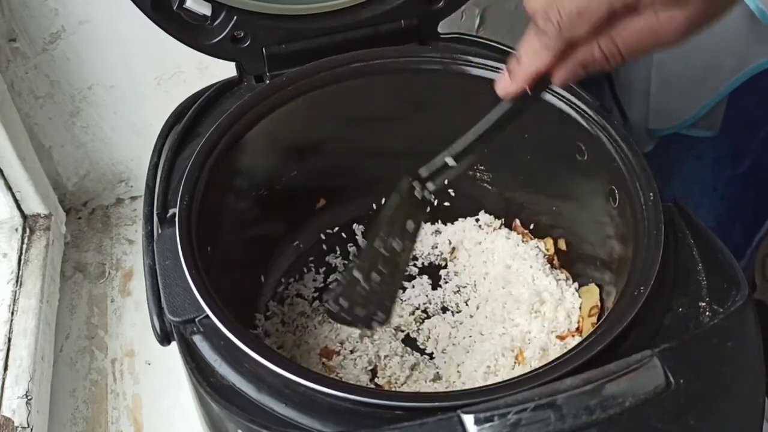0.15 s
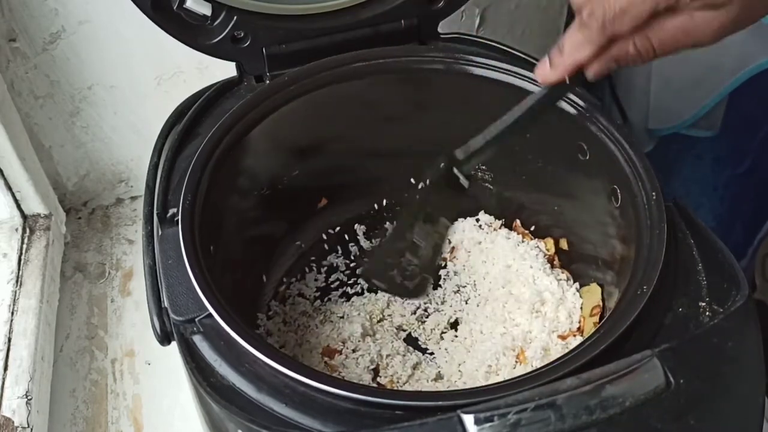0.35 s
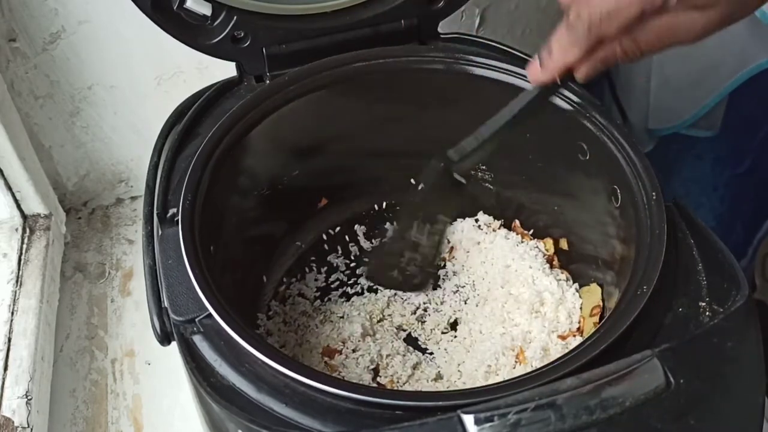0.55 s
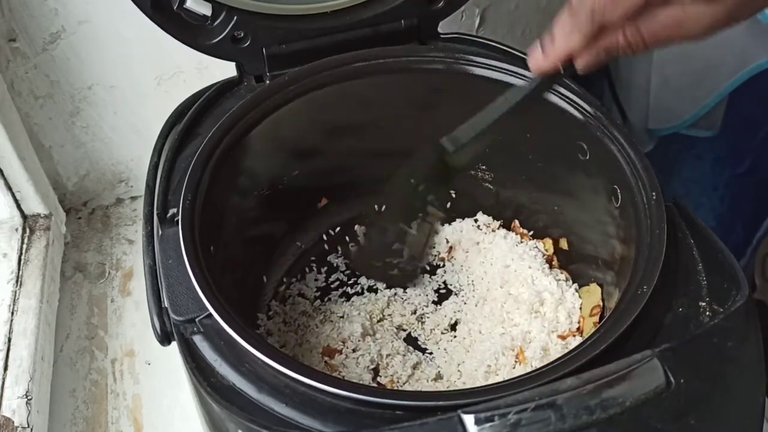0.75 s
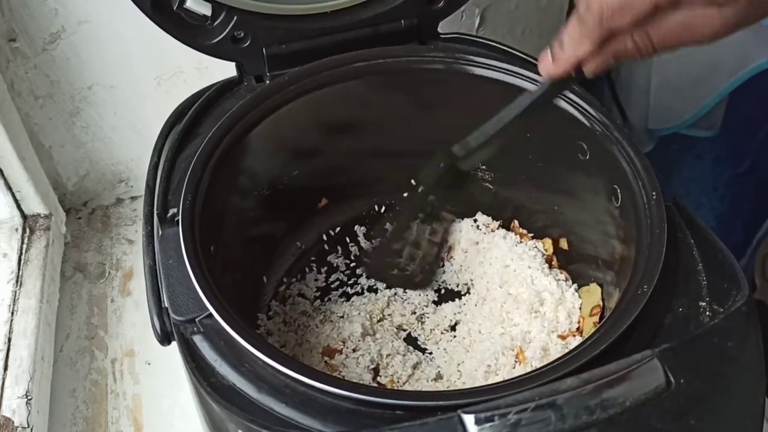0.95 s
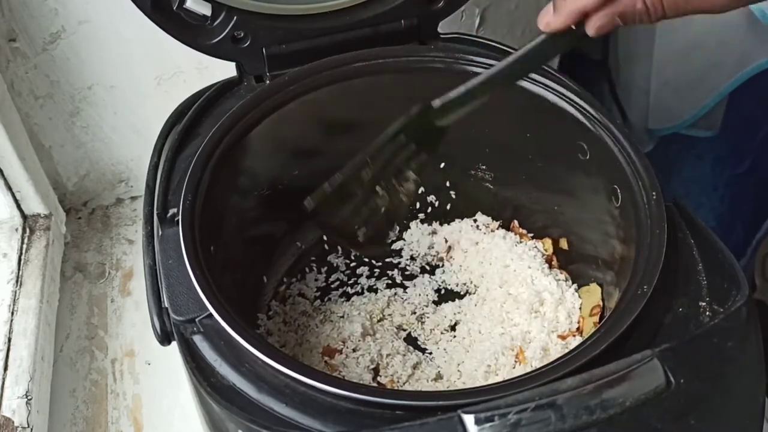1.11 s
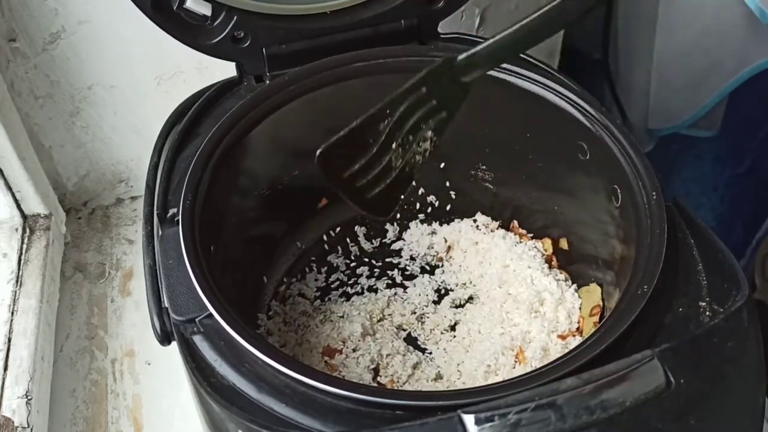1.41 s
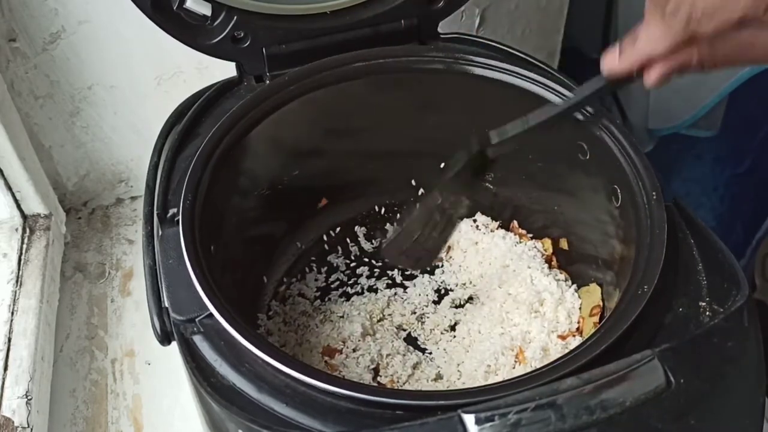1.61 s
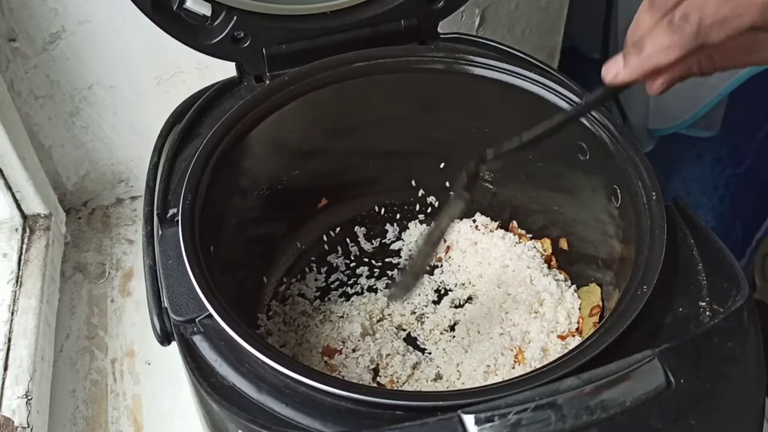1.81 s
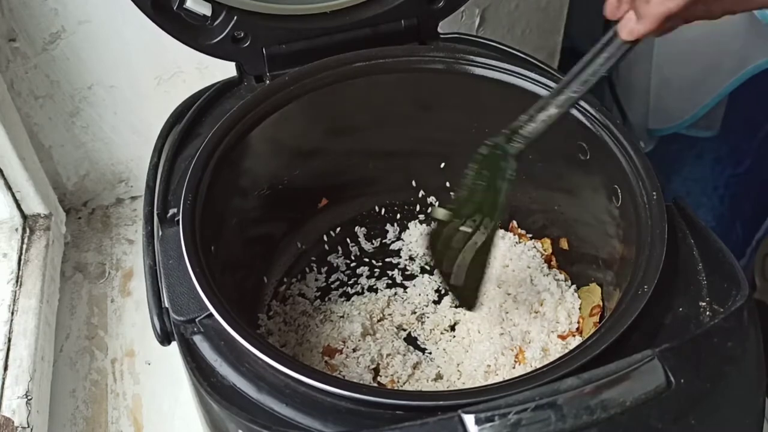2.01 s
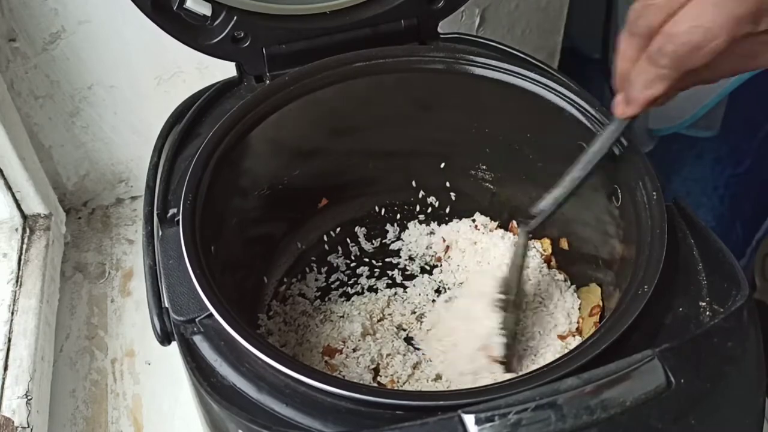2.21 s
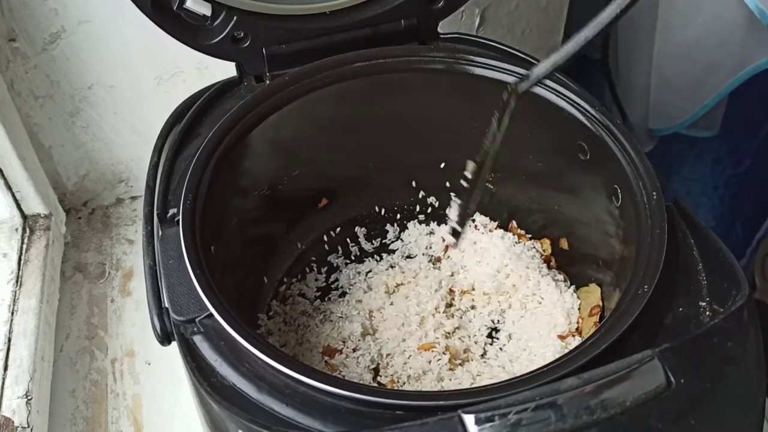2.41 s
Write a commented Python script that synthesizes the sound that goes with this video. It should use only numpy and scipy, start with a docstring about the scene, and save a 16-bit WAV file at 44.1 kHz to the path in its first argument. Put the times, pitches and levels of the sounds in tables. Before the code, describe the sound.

Sharp spatula knocks on a metal bowl, each followed by a short gritty shove of dry rice

```python
"""In a kitchen, a plastic spatula chops nine times through raw rice onto the floor of a coated metal bowl.
A faint hiss leads up to each crack on the metal, then rice is shoved along: all coloured random clicks.
The bowl thuds (grain rumble, sine knocks) and rings (struck modes). Stray grains tick, a few trickle.
A hum and hiss lie beneath. Two microphone ports, the left one nearer."""
import sys
import numpy as np
from scipy import signal
from scipy.fft import rfft, irfft, next_fast_len
from scipy.io import wavfile

SR = 44100
rng = np.random.default_rng(int(sys.argv[2]) if len(sys.argv) > 2 else 0)


def store_pcm(level_fs):
    """Save levels as 16-bit WAV."""
    pcm = np.round(np.clip(level_fs, -1, 1) * 32767).astype(np.int16)
    wavfile.write(sys.argv[1], SR, np.atleast_2d(pcm).T)


N = 112454
T = np.arange(N) / SR


def amp(db):
    """Decibels to a linear factor."""
    return 10 ** (np.asarray(db) / 20)


def rms_one(x):
    """Scale to rms 1."""
    return x / np.sqrt(np.mean(x ** 2) + 1e-20)


def at_hz(points, hz):
    """Read a curve of (Hz, value) points, straight between points on a log frequency axis."""
    point_hz, values = np.array(points).T
    return np.interp(np.log(hz + 1), np.log(point_hz), values)


def colour(x, spectrum, size=4096, unit=True):
    """Causal (minimum-phase) filter of the given spectrum; with unit, white noise keeps its power."""
    hz = np.arange(size // 2 + 1) * SR / size
    cepstrum = irfft(np.log(amp(at_hz(spectrum, hz))))
    # folding the cepstrum forward in time makes the phase minimum
    cepstrum[1:size // 2] *= 2
    cepstrum[size // 2 + 1:] = 0
    pulse = irfft(np.exp(rfft(cepstrum)))
    if unit:
        pulse = pulse / np.sqrt(np.sum(pulse ** 2))
    return signal.fftconvolve(x, pulse[None] if x.ndim > 1 else pulse, axes=-1)[..., :N]


def grains(per_s, spread_db):
    """Two unrelated trains of random clicks of uneven size; rms 1."""
    sizes = amp(spread_db * np.minimum(rng.exponential(1, (2, N)), 4))
    signs = rng.choice([-1, 1], (2, N))
    return rms_one(sizes * signs * (rng.random((2, N)) < per_s / SR))


def ring(x, hz, t60):
    """Two-pole resonance: a unit click sets a decaying sine of starting height 1 ringing."""
    r, w = amp(-60 / (t60 * SR)), 2 * np.pi * hz / SR
    return signal.lfilter([0, np.sin(w)], [1, -2 * r * np.cos(w), r * r], x + 1e-18)


def drift(rate_hz):
    """Slow random wandering, rms 1: noise through two equal low-pass poles."""
    r = np.exp(-2 * np.pi * rate_hz / SR)
    settled = signal.lfilter([1], [1, -2 * r, r * r], rng.standard_normal(N + SR))[SR:]
    return rms_one(settled)


def fall(start, db, db_per_s, hold=0., rise=0.00038):
    """Envelope: short rise, hold, then a steady fall in dB."""
    attack = np.clip((T - start) / rise, 0, 1)
    return attack * amp(db - db_per_s * np.clip(T - start - hold, 0, 1))


def ports(pair, likeness, lag_s):
    """Blend two unrelated signals into left and right of given likeness; the right port hears later."""
    size = next_fast_len(N + 256)
    hz = np.arange(size // 2 + 1) * SR / size
    alike = np.clip(at_hz(likeness, hz), 0, 1)
    shared, opposed = rfft(pair, size) / np.sqrt(2)
    shared, opposed = np.sqrt(1 + alike) * shared, np.sqrt(1 - alike) * opposed
    late = np.exp(-2j * np.pi * hz * lag_s)
    return irfft([shared + opposed, (shared - opposed) * late], size)[:, :N]


def pan(x, db):
    """Raise the left over the right by db in all; a negative value leans right."""
    return x * amp([[db / 2], [-db / 2]])


# Spectrum of the room hiss. Each row: frequency in Hz, relative level in dB.
AIR_SPECTRUM = [(30, -30.5), (95, -11), (157, -19.5), (283, -27.5), (454, -18), (603, -32), (944, -32),
                (2940, -47), (5000, -47), (6800, -45), (8500, -45), (13000, -34)]
# Stereo match of the hiss. Each row: frequency in Hz, left-right likeness from 0 to 1.
AIR_LIKENESS = [(60, 0.95), (300, 0.76), (1500, 0.067), (8000, 0.12)]
# The hum swells and sinks. Each row: time in seconds, mean level in dB.
HUM_LEVELS = [(0, -50.5), (.2, -57), (1.2, -59), (1.4, -47), (1.7, -43), (1.9, -60), (2.2, -47.5),
              (2.55, -47)]
AIR_DB, HUM_HZ, HUM_WAVER_DB = -48, 98.4, 1.9


def air():
    """Room noise as coloured hiss, plus a wavering sine hum that is the same at both ports."""
    hum_db = np.interp(T, *np.transpose(HUM_LEVELS)) + HUM_WAVER_DB * drift(3.0)
    hum = np.sqrt(2) * amp(hum_db) * np.sin(2 * np.pi * HUM_HZ * T)
    hiss = ports(colour(rng.standard_normal((2, N)), AIR_SPECTRUM), AIR_LIKENESS, 0)
    return amp(AIR_DB) * hiss + hum


# Loose grains trickling back. Each row: start in seconds, level in dB, hold in seconds.
TRICKLES = [(0, -55, 0.3), (2.367, -58, 0.062)]
# Spectrum of sliding rice. Each row: frequency in Hz, relative level in dB.
SLIDE_SPECTRUM = [(500, -21), (1100, -13.5), (1500, -6.5), (2180, -3.5), (3080, -3.5), (3900, 1),
                  (5020, -8.5), (6780, 5), (8500, -3), (13000, -2.5)]


def trickles():
    """Faint sliding of grains at the start and after the last chop: sparse, fairly even clicks."""
    env = sum(fall(s, db, 220, hold, 0.007) for s, db, hold in TRICKLES)
    return colour(env * grains(1400.0, 1.6), SLIDE_SPECTRUM)


# Stray grains that drop. Each row: start in seconds, level in dB.
TICKS = [(0.1237, -27), (1.54, -31), (2.1143, -28), (2.41, -31.5), (2.4322, -36.5)]
# Spectrum of grain on metal. Each row: frequency in Hz, relative level in dB.
CRACK_SPECTRUM = [(300, -9), (630, -3.5), (1230, -14.5), (1650, -17), (3240, -4), (3830, 1), (5070, -11),
                  (6800, 3.75), (8500, -3.5), (13000, -4.5)]
CRACK_GRAINS_PER_S, CRACK_SPREAD_DB = 6000, 2.5
CRUSH_CREST_DB = 8.5  # taken off a listed level to set the level of its grain burst
TICK_T60_S = 0.0082


def ticks():
    """Single grains drop: very short bursts of clicks with the colour of the cracks."""
    env = sum(fall(s, db - CRUSH_CREST_DB, 60 / TICK_T60_S) for s, db in TICKS)
    return colour(env * grains(CRACK_GRAINS_PER_S, CRACK_SPREAD_DB), CRACK_SPECTRUM)


# The nine chops. Each row: start in seconds, crack level in dB, lead-in hiss length in seconds,
# lead-in hiss level in dB, shove level in dB, shove and thud hold in seconds, thud level in dB,
# boom level in dB, ring levels of the low, middle and high bowl modes in dB, upper-treble gain in dB,
# slap pitch in Hz, slap level in dB, rasp level in dB.
CHOPS = [(0.2357, -3, 0.032, -31.5, -30.5, 0.038, -24.5, -66, -36.5, -31.5, -43, 0.5, 1736, -18, -38.5),
         (0.4025, 1.5, 0.02, -25.5, -29, 0.047, -25, -27, -35, -41, -50, -2.5, 1930, -26, -30),
         (.6, 3.5, 0.028, -28, -31, 0.068, -29, -32.5, -35, -41.5, -42, -8.8, 2700, -30, -27.5),
         (.812, 1.5, 0.028, -28.5, -28, 0.065, -30.5, -34.5, -32, -33.5, -40, -11.3, 1630, -30.5, -27),
         (1.017, 2, 0.025, -29, -27.5, 0.034, -32.5, -49.5, -35.5, -37, -35.5, -17, 2410, -26.5, -26),
         (1.2431, -0.5, .02, -28, -29, 0.018, -38, -45, -38, -41.5, -38.5, -14.5, 2520, -23, -30),
         (1.688, 4, 0.023, -23, -27, 0.055, -28, -32, -37, -38.5, -65, -6, 2050, -27, -27.5),
         (1.902, -1.5, .026, -32.5, -30.5, 0.044, -27, -32, -32.5, -40, -56, -1.5, 2700, -23.5, -30.5),
         (2.1751, -3, 0.012, -31, -33, 0.036, -34.5, -40, -62, -36.5, -61, 2.5, 1850, -24.5, -35)]
(START_S, CRACK_DB, LEAD_S, LEAD_IN_DB, SHOVE_DB, HOLD_S, THUD_DB, BOOM_DB,
 _, _, _, BRIGHT_DB, SLAP_HZ, SLAP_DB, RASP_DB) = np.transpose(CHOPS)
SLIDE_GRAINS_PER_S, LEAD_IN_SPREAD_DB = 8100, 3.0


def lead_in():
    """A faint hiss of clicks that leads up to each crack and stops there."""
    env = 0
    for s, lead, db in zip(START_S, LEAD_S, LEAD_IN_DB):
        env = env + amp(db) * np.clip((T - s + lead) / 0.018, 0, 1) * (T < s)
    return colour(env * grains(SLIDE_GRAINS_PER_S, LEAD_IN_SPREAD_DB), SLIDE_SPECTRUM)


# Knocks of the bowl in its housing. Each row: start in seconds, level in dB, pitch in Hz.
KNOCKS = [(.235, -12.5, 482), (.266, -14, 388), (.297, -19.5, 330), (.41, -18.5, 240), (.428, -17, 426),
          (.608, -20.5, 245), (.625, -15, 455), (0.828, -17, 363), (.866, -26, 660), (1.032, -19.5, 368),
          (1.242, -28, 415), (1.697, -16, 353), (1.7, -19.5, 763), (1.748, -25, 391), (1.903, -15, 478),
          (1.916, -11, 346.5), (1.95, -20, 321), (2.176, -25.5, 415)]
# Spectrum of the rumble. Each row: frequency in Hz, relative level in dB.
THUD_SPECTRUM = [(50, -58.5), (120, 1.5), (230, 2), (400, 1.1), (780, -6.5), (1000, -11.5), (1500, -25),
                 (3000, -51)]
THUD_RISE_S, THUD_FALL_DB_PER_S, LUMPS_PER_S = 0.022, 251, 1100
HOUSING_HZ, HOUSING_T60_S, HOUSING_DB = 410, .25, -42
KNOCK_T60_S, KNOCK_RISE_S, KNOCK_SIDE = 0.059, 0.0071, .3
BOOM_HZ, BOOM_T60_S, BOOM_PUSH_S = 124, 0.47, 0.015  # the push is both rise and hold


def thuds():
    """The loose bowl in its housing: a lumpy rumble, single sine knocks, and the housing's slow boom."""
    env = sum(fall(s, db, THUD_FALL_DB_PER_S, hold, THUD_RISE_S)
              for s, db, hold in zip(START_S, THUD_DB, HOLD_S))
    lumps = env * grains(LUMPS_PER_S, 2.2)
    out = colour(lumps, THUD_SPECTRUM) + amp(HOUSING_DB) * ring(lumps, HOUSING_HZ, HOUSING_T60_S)
    for s, db, hz in KNOCKS:
        knock = fall(s, db, 60 / KNOCK_T60_S, 0, KNOCK_RISE_S) * np.sin(2 * np.pi * hz * (T - s))
        out += knock * [[np.sqrt(2)], [KNOCK_SIDE]]  # mostly in the shared part, some in the opposed
    for s, db in zip(START_S, BOOM_DB):
        push = fall(s, db, 60 / BOOM_T60_S, BOOM_PUSH_S, BOOM_PUSH_S)
        out[0] += np.sqrt(2) * push * np.sin(2 * np.pi * BOOM_HZ * (T - s))
    return out


CRACK_T60_S, FIRST_TOUCH_DB = .035, 7
SLAP_T60_S, SLAP_RING_S = 0.035, 0.0068  # fall of the driving grains, T60 of the resonance


def cracks():
    """A sharp first touch, grains crushed between blade and metal, the flat of the blade landing."""
    env = sum(fall(s, db - CRUSH_CREST_DB, 60 / CRACK_T60_S) for s, db in zip(START_S, CRACK_DB))
    crush = env * grains(CRACK_GRAINS_PER_S, CRACK_SPREAD_DB)
    for s, db in zip(START_S, CRACK_DB):
        crush[0, int((s + .001) * SR)] += amp(db + FIRST_TOUCH_DB)
    flat = grains(CRACK_GRAINS_PER_S, CRACK_SPREAD_DB)
    slaps = 0
    for s, hz, db in zip(START_S, SLAP_HZ, SLAP_DB):
        landing = fall(s, db - CRUSH_CREST_DB, 60 / SLAP_T60_S) * flat
        slaps = slaps + ring(landing, hz, SLAP_RING_S)
    return colour(crush, CRACK_SPECTRUM) + slaps


# Metal bowl, most modes in close pairs that beat.
# Each row: frequency in Hz, relative level in dB, T60 in seconds, index of the ring column in CHOPS.
BOWL_MODES = [(648, 0, .55, 8), (657, -4, .4, 8), (1157, 0, .4, 9), (1172, -4, .3, 9), (1604, 0, .4, 10),
              (1617, -5, .3, 10), (1960, -10, .4, 10)]
MODE_SCATTER_DB, SHOVE_DRIVE = 1.5, .0015


def bowl(rice):
    """Every chop strikes each mode with a strength of its own; the moving rice keeps it going."""
    out, rows = 0, np.array(CHOPS)
    scatter = rng.normal(0, MODE_SCATTER_DB, (len(rows), len(BOWL_MODES)))
    for k, (hz, db, t60, column) in enumerate(BOWL_MODES):
        clicks = SHOVE_DRIVE * rice
        clicks[0, (START_S * SR).astype(int)] += amp(rows[:, int(column)] + scatter[:, k])
        out = out + amp(db) * ring(clicks, hz, t60)
    return out


SHOVE_FALL_DB_PER_S, RASP_FALL_DB_PER_S = 298.5, 253.5
GRIT_DB, GRIT_RATE_HZ = 1.5, 120


def shove(levels_db, db_per_s):
    """Rice pushed over the floor of the bowl: raw grain contacts whose level wanders quickly."""
    env = sum(fall(s, db, db_per_s, hold, .006) for s, db, hold in zip(START_S, levels_db, HOLD_S))
    return env * amp(GRIT_DB * drift(GRIT_RATE_HZ)) * grains(SLIDE_GRAINS_PER_S, 5.2)


# Short resonances that the moving rice drives. Each row: frequency in Hz, gain in dB, T60 in seconds.
RASP_MODES = [(773, -38, .08), (3450, -33, .025), (3720, -33, .035), (3890, -32, .045), (4120, -33, .025),
              (4480, -35, .03), (6140, -35, .04), (6800, -33, .04), (7300, -36, .03)]


def rasp(rice):
    """Short resonances of blade and bowl wall under the moving rice."""
    return sum(amp(db) * ring(rice, hz, t60) for hz, db, t60 in RASP_MODES)


BRIGHT_HZ = 4900  # the gain acts above this


def brighten(x):
    """Each chop lands at another angle and place: its upper treble has a level of its own."""
    # a chop's gain holds from its lead-in hiss until the next one; the first also covers the opening
    which = np.clip(np.searchsorted(START_S - LEAD_S, T) - 1, 0, None)
    low = signal.sosfilt(signal.butter(4, BRIGHT_HZ, "low", fs=SR, output="sos"), x)
    high = signal.sosfilt(signal.butter(4, BRIGHT_HZ, "high", fs=SR, output="sos"), x)
    return low + amp(BRIGHT_DB[which]) * high


ROOM_T60_S, ROOM_DB = 0.47, -24


def kitchen(x):
    """A dying wash of reflections: decaying noise, different at each port."""
    t = T[:SR // 3]
    echoes = rng.standard_normal((2, len(t))) * amp(-60 * t / ROOM_T60_S) * (t > .003)
    echoes = echoes / np.sqrt(np.sum(echoes ** 2, axis=1, keepdims=True))
    return amp(ROOM_DB) * signal.fftconvolve(x, echoes, axes=1)[:, :N]


# Stereo match of the grain sounds. Each row: frequency in Hz, left-right likeness from 0 to 1.
GRAIN_LIKENESS = [(60, 0.99), (250, 1), (700, 0.18), (2000, 0.25), (8000, 0.23)]
# Stereo match of thuds and bowl. Each row: frequency in Hz, left-right likeness from 0 to 1.
BODY_LIKENESS = [(60, 0.99), (250, 0.87), (700, 0.58), (2000, 0.17)]
GRAIN_LAG_S, BODY_LAG_S = 0.0004645, 0.00016
LEAD_IN_PAN_DB, BOWL_PAN_DB = 5, -2


def scene():
    """Grain sounds, thuds and bowl at the two ports, then reflections and room air."""
    rice = shove(SHOVE_DB, SHOVE_FALL_DB_PER_S)
    rasping = rasp(shove(RASP_DB, RASP_FALL_DB_PER_S))
    chopping = brighten(ticks() + cracks() + colour(rice, SLIDE_SPECTRUM) + rasping)
    near = ports(chopping + trickles(), GRAIN_LIKENESS, GRAIN_LAG_S)
    near = near + ports(thuds(), BODY_LIKENESS, BODY_LAG_S)
    near = near + pan(ports(bowl(rice), BODY_LIKENESS, BODY_LAG_S), BOWL_PAN_DB)
    near = near + pan(ports(brighten(lead_in()), GRAIN_LIKENESS, GRAIN_LAG_S), LEAD_IN_PAN_DB)
    return near + kitchen(near) + air()


# Microphone response. Each row: frequency in Hz, gain in dB.
MIC_RESPONSE = [(30, -13.5), (80, -5), (8450, 5), (8850, -11.5), (11300, -34.5), (11650, -3.5),
                (15400, -8.5), (16000, -32)]
TOP, CUTOFF_HZ = .88, 16900  # amplitude that rounded peaks approach, stopband edge


def record(dry):
    """The microphone has a deep dip in the upper treble; the highest peaks are rounded; the top is cut."""
    heard = colour(dry, MIC_RESPONSE, unit=False)
    heard = heard / (1 + (np.abs(heard) / TOP) ** 6) ** (1 / 6)
    return signal.sosfilt(signal.cheby2(12, 70, CUTOFF_HZ, fs=SR, output="sos"), heard)


dry = scene()
out = record(dry)
store_pcm(out)
```